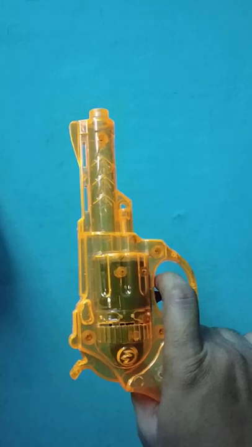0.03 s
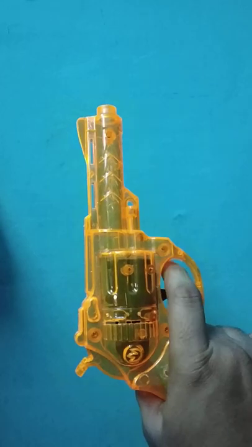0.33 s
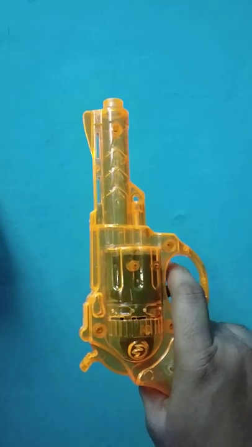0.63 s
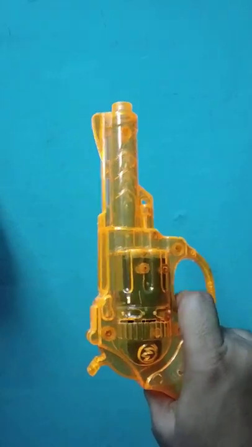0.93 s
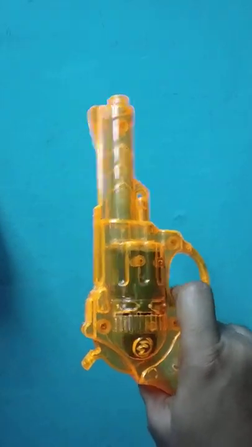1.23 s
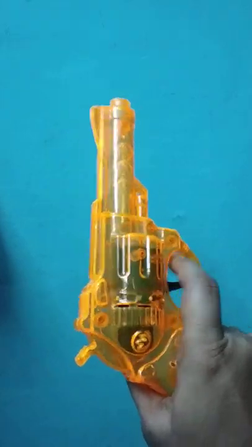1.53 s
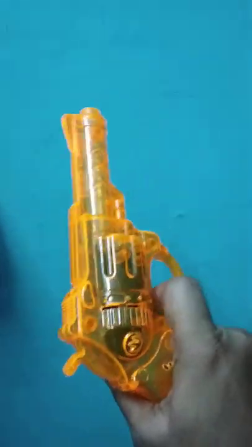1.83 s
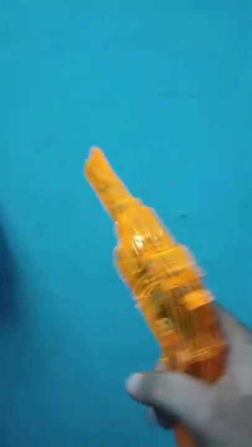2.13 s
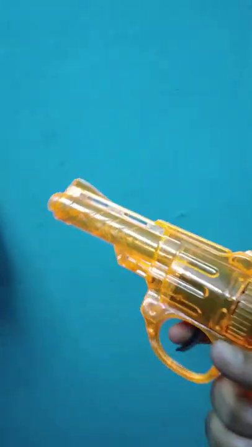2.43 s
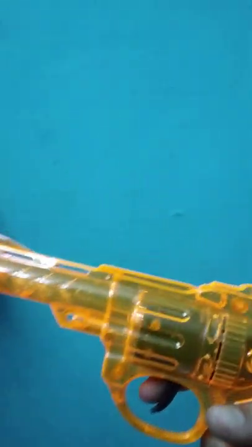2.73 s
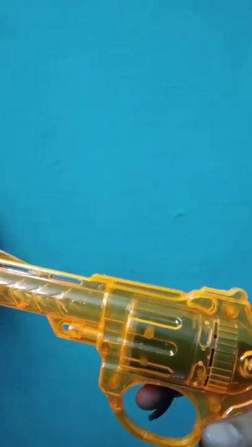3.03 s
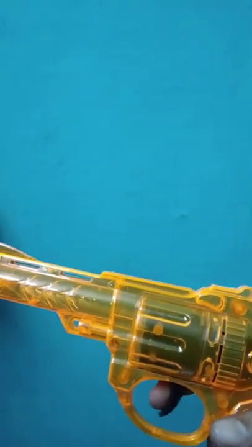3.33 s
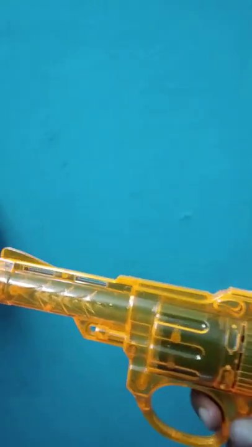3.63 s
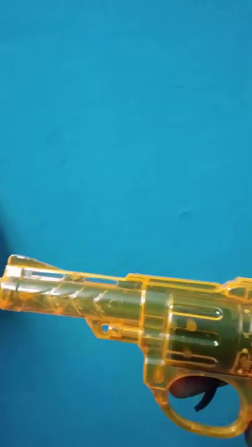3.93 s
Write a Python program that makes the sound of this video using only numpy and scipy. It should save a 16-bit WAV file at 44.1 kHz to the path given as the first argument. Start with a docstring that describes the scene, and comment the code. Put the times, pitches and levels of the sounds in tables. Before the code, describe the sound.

Harsh ratcheting clicks and whirring gears from a toy gun quicken, then wind down.

```python
"""A plastic toy spark gun, close to a stereo microphone in a small room with a faint hum.
Trigger pulls drive a flywheel through whirring gears; a springy striker snaps once a turn,
ever faster, then slower as the wheel coasts and rubs. The hollow shell adds a brief ring.
The recorder's limiter ducks at the snaps and lets room noise, rubbing and echo swell up in between."""
import sys
import numpy as np
from scipy import signal
from scipy.fft import rfft, irfft, next_fast_len
from scipy.io import wavfile
from scipy.ndimage import uniform_filter1d, minimum_filter1d, map_coordinates

SR = 44100
rng = np.random.default_rng(int(sys.argv[2]) if len(sys.argv) > 2 else 0)


def persist_wave(psi):
    """Save psi, clipped to +-1, as 16-bit WAV."""
    counts = np.round(np.clip(psi, -1, 1) * 32767).astype(np.int16)
    wavfile.write(sys.argv[1], SR, np.atleast_2d(counts).T)


N = 176400

# The striker's snaps, one a turn of the wheel. Each row: start in seconds, relative level in dB.
SNAPS = [(.7288, -1.5), (0.8491, -6), (.912, -3), (0.9778, 1), (1.0455, 2), (1.1111, 0), (1.1653, -0.5),
         (1.2133, -0.5), (1.2633, 3.5), (1.3142, 1), (1.3618, 0.5), (1.4043, -1), (1.446, 2.5), (1.4878, 4),
         (1.5311, 1.5), (1.574, -1), (1.6116, 0), (1.6485, 2.5), (1.6856, 9), (1.7244, 7.5), (1.7637, 5),
         (1.799, 6), (1.8342, 2), (1.8687, 2.5), (1.9022, 2.5), (1.9388, 2), (1.9746, 3.5), (2.0123, 2.5),
         (2.0491, 2), (2.0861, 2), (2.1271, 3.5), (2.1664, 6.5), (2.2088, 5.5), (2.2516, 4.5), (2.297, 3),
         (2.3423, 0.5), (2.3897, 1.5), (2.437, 3), (2.4872, 0), (2.5413, 4), (2.5955, 2.5), (2.6522, 0.5),
         (2.712, 2.5), (2.7744, 2), (2.8401, 2), (2.9089, 3), (2.983, -1), (3.0616, -0.5), (3.1467, 2),
         (3.2424, 4.5), (3.3495, 3.5), (3.4704, -1.5), (3.556, -1.5), (3.64, 3.5), (3.7316, 4.5),
         (3.8356, 3), (3.9556, 5)]


def amp(db):
    """Decibels to gain."""
    return 10 ** (np.asarray(db) / 20)


def along(points, hz):
    """Reads (Hz, value) points on a log frequency axis."""
    f, v = np.transpose(points)
    return np.interp(np.log(hz + 1), np.log(f + 1), v)


def level(rows):
    """A gain for every sample from (seconds, dB) points."""
    return amp(np.interp(np.arange(N) / SR, *np.transpose(rows)))


def filtered(x, response):
    """x through a filter whose gain is response(hz)."""
    size = next_fast_len(N + SR // 2)
    return irfft(rfft(x, size) * response(np.fft.rfftfreq(size, 1 / SR)), size)[..., :N]


def coloured(pair, spectrum):
    """Two unrelated signals become a stereo sound of rms 1 with this spectrum, wider in the treble."""
    # Likeness of the two channels. Each row: frequency in Hz, correlation.
    likeness = [(100, 0.65), (350, 0.93), (700, 0.64), (1400, 0.25), (4000, 0.22), (15000, 0.067)]
    angle = lambda hz: np.arccos(along(likeness, hz)) / 2
    response = lambda hz: amp(along(spectrum, hz)) * [np.cos(angle(hz)), np.sin(angle(hz))]
    mid, side = filtered(pair, response)
    return unit(np.array([mid + side, mid - side]))


def unit(x):
    """Scaled to rms 1."""
    return x / np.sqrt(np.mean(x ** 2) + 1e-20)


def add(track, start, sound):
    """Mixes a sound in at start seconds."""
    part = track[:, round(start * SR):][:, :sound.shape[-1]]
    part += sound[..., :part.shape[1]]


def wobble(rate):
    """A smooth random curve, rate knots a second."""
    return map_coordinates(rng.standard_normal(N), [np.arange(N) * rate / SR])


def room_noise():
    """The room's low rush fades in, with a slightly unsteady hum in it."""
    # Colour of the rush. Each row: frequency in Hz, relative level in dB.
    rush_colour = [(30, -44), (80, -28), (120, -19.5), (205, -8), (350, 4), (570, -9), (750, -8),
                   (1000, -11), (1400, -13), (1800, -16), (2600, -19), (5400, -25.5), (10000, -28.5),
                   (15500, -33)]
    # Tones of the hum. Each row: frequency in Hz, level in dB against the rush.
    hum_tones = [(208, -15), (248, -13), (308, -11.5), (372, -12)]
    # Fade of both. Each row: time in seconds, level in dB.
    fade = [(.075, -110), (.09, -56), (.15, -51), (.26, -44), (.45, -43), (.6, -43), (.66, -43.5),
            (.73, -38), (1, -39.5), (4, -37.5)]
    t = np.arange(N) / SR
    hum = sum(amp(db) * np.sin(2 * np.pi * hz * t + wobble(12)) for hz, db in hum_tones)
    rush = coloured(rng.standard_normal((2, N)), rush_colour)
    return level(fade) * (rush + np.sqrt(2) * hum)


def trigger(tick_t60_s=0.012, tail_t60_s=0.38):
    """The trigger takes up its slack: small plastic ticks as the teeth engage."""
    # The ticks. Each row: start in seconds, level in dB.
    ticks = [(.687, -22), (0.6909, -19.5), (0.6955, -13), (.708, -34)]
    envelope, t = np.zeros((2, N)), np.arange(SR // 10) / SR
    decay = amp(-60 * t / tick_t60_s) + amp(-22.5 - 60 * t / tail_t60_s)
    for start, db in ticks:
        add(envelope, start, amp(db) * decay)
    return envelope * rubbing()


def friction(spectrum, grit=0.17):
    """Friction noise that comes in tiny grains."""
    grains = rng.standard_normal((2, N)) * np.exp(grit * wobble(900))
    return coloured(unit(grains), spectrum)


def rubbing():
    """Plastic rubs on plastic, at the trigger and at the wheel."""
    # Colour of the rub. Each row: frequency in Hz, relative level in dB.
    rub_colour = [(100, -2), (350, -69.5), (720, -3.5), (950, -30), (1350, 13), (1800, 2), (2300, 7.5),
                  (3200, -3), (4200, -7), (6500, 2.5), (9000, 0), (15500, -12.5)]
    return friction(rub_colour)


def flywheel(cam_load_db=2):
    """The spinning wheel rubs, louder at speed and as its cam lifts the striker."""
    # Strength of the rub. Each row: time in seconds, level in dB.
    rub_levels = [(.68, -110), (.72, -57), (.76, -15.5), (.9, -18.5), (1.25, -13.5), (1.6, -8.5),
                  (2.0, -5.5), (2.3, -11.5), (2.7, -12), (3.1, -14.5), (3.6, -14), (4, -17.5)]
    turn = np.interp(np.arange(N) / SR, np.transpose(SNAPS)[0], np.arange(len(SNAPS))) % 1
    load_db = cam_load_db * (turn ** 2 - .5) + 1.7 * wobble(60)
    return level(rub_levels) * amp(load_db) * shell(rubbing())


def shell(x, ring_db=-6, t60_s=0.015):
    """The hollow plastic body adds its dense, short resonances; rms 1."""
    t = np.arange(SR // 40) / SR
    body = rng.standard_normal((2, len(t))) * amp(-60 * t / t60_s)
    body /= np.linalg.norm(body[0])
    return unit(x + amp(ring_db) * signal.fftconvolve(x, body, axes=1)[:, :N])


def striker():
    """Each snap, much like the last: a crack at the slip, a bright ring on landing, the room's answer."""
    # Colour of the crack. Each row: frequency in Hz, relative level in dB.
    crack_colour = [(100, -62), (400, -26), (750, -14.5), (1400, -10.5), (2700, -3.5), (3400, -2),
                    (4050, 3), (4550, 5.5), (5000, 8.5), (5500, 8), (6500, -4.5), (8200, 0.5), (9300, 8.5),
                    (10100, -2), (12000, -2), (13500, 3), (14500, -14), (15600, -1)]
    # Modes stirred at the slip and on landing. Each row: frequency in Hz, relative dB, t60 in seconds.
    slip_modes = [(1550, -59.5, 0.045), (3959, -1, 0.018), (4080, -4.5, 0.027), (4800, -21, 0.024)]
    landing_modes = [(5210, 19, 0.0099), (5130, 3.5, 0.035), (5100, -14, 0.25), (5180, -1.5, 0.092),
                     (5580, -21, 0.09), (8820, -13, .016), (9270, -4, 0.048), (11760, -2.5, 0.017)]
    # The ring sags a little while the wheel spins fast. Each row: time in seconds, pitch factor.
    ring_pitch = [(.73, 1), (1.4, 0.99), (2.0, 0.99), (2.7, 0.99), (3.3, 1.005), (4, 1.028)]
    # The room's answer changes as the toy is turned. Each row: time in seconds, change in dB.
    echo_change = [(.73, -0.5), (1.3, 0), (2.0, 1.5), (2.3, -1.5), (3.0, -2), (4, -2)]
    snap_gain_db, crack_gain_db, echo_gain_db = 4, 4, -4.5
    crack_rise_s, crack_t60_s, landing_delay_s, landing_rise_s = 0.00015, 0.037, .0016, .0006
    crack_alike, echo_alike = 0.3, 0.73  # shares of power common to all snaps
    out, t = np.zeros((2, N)), np.arange(SR // 5) / SR
    noise = shell(coloured(rng.standard_normal((2, N)), crack_colour))
    common_grain, common_tail = noise[:, SR:SR + len(t)], room_tail()
    crack_envelope = amp(crack_gain_db - 60 * t / crack_t60_s) * (1 - np.exp(-t / crack_rise_s))
    landed = np.maximum(t - landing_delay_s, 0)
    for start, db in SNAPS:
        fresh_grain = noise[:, rng.integers(N - len(t)):][:, :len(t)]
        grain = np.sqrt(crack_alike) * common_grain + np.sqrt(1 - crack_alike) * fresh_grain
        pitch = np.interp(start, *np.transpose(ring_pitch))
        slip = grain * crack_envelope + ring(slip_modes, t, pitch)
        landing = ring(landing_modes, landed, pitch) * (1 - np.exp(-landed / landing_rise_s))
        snap = amp(snap_gain_db + db) * (slip + landing)
        tail = np.sqrt(echo_alike) * common_tail + np.sqrt(1 - echo_alike) * room_tail()
        echo_db = echo_gain_db + np.interp(start, *np.transpose(echo_change))
        add(out, start, snap)
        add(out, start, amp(echo_db) * signal.fftconvolve(snap, tail, axes=1))
    return out


def ring(modes, t, pitch, scatter_db=1.5, scatter_pitch=0.014):
    """The striker's damped modes, a little different at every blow."""
    out = np.zeros(len(t))
    for hz, db, t60 in modes:
        louder, sharper = rng.standard_normal(2)
        detune = 1 + scatter_pitch * sharper * np.exp(-t60 / 0.088)  # long modes stray least
        out += amp(db + scatter_db * louder - 60 * t / t60) * np.sin(2 * np.pi * hz * pitch * detune * t)
    return out


def room_tail(build_s=0.033):
    """The small room's stereo echo; each frequency dies at its own speed."""
    # Decay of the room. Each row: frequency in Hz, t60 in seconds.
    decay_times = [(200, 0.55), (1500, 0.33), (5000, 0.14), (15000, 0.15)]
    hz, t, bands = signal.stft(rng.standard_normal((2, SR // 3)), SR, nperseg=256)
    envelope = amp(-60 * t / along(decay_times, hz)[:, None]) * (1 - np.exp(-t / build_s))
    tail = signal.istft(bands * envelope, SR, nperseg=256)[1]
    return tail / np.linalg.norm(tail[0])


def gears(mesh_rise_per_s=2.6, mesh_jitter=.024, mesh_db=-1.5, treble_hz=2800):
    """Each pull swells into a rasp with a rising, rough tooth tone; slow gears sound duller."""
    # Trigger pulls and slow binding of the gears. Each row: time of the hardest push, rise and fall
    # in seconds, level in dB, tooth rate at that push in Hz, treble gain in dB.
    pulls = [(.838, 0.056, 0.022, -10, 1335, 0), (1.107, 0.043, 0.059, -2, 1380, -2),
             (1.362, .03, 0.06, -1.5, 1934, -1.5), (1.578, .03, 0.022, -3.5, 2170, 3.5),
             (1.795, 0.018, 0.049, 2.5, 2400, 1), (2.07, .025, 0.022, -12, 2320, 0),
             (3.23, .025, 0.029, -11.5, 650, -15), (3.335, .02, .014, -9.5, 650, -12),
             (3.453, 0.023, 0.056, -7.5, 1130, -12), (3.548, 0.014, 0.036, -11.5, 624, -5),
             (3.825, .018, 0.0094, -15, 639, 0)]
    # Colour of the gears. Each row: frequency in Hz, relative level in dB.
    gear_colour = [(100, -37), (400, -19), (950, -19.5), (1200, -5.5), (1400, 2), (1800, -6), (2500, -2),
                   (3200, -4.5), (4500, 6), (6000, 2), (8000, 1.5), (10500, -7.5), (15500, -12)]
    out, t = np.zeros((2, N)), np.arange(N) / SR
    rasp = shell(friction(gear_colour))
    unsteady, chatter = 1 + mesh_jitter * wobble(700), amp(3 * wobble(250))
    for push, rise, fall, db, hz, treble_db in pulls:
        near = abs(t - push) < .15
        since = t[near] - push
        mesh_hz = hz * np.exp(mesh_rise_per_s * np.minimum(since, fall / 2)) * unsteady[near]
        phase = 2 * np.pi * np.cumsum(mesh_hz) / SR
        teeth = sum(amp(along(gear_colour, k * hz)) * np.sin(k * phase + rng.uniform(0, 2 * np.pi))
                    for k in range(1, 7))
        whir = rasp[:, near] + amp(mesh_db) * unit(chatter[near] * teeth)
        dull = signal.filtfilt(*signal.butter(2, treble_hz, fs=SR), whir)
        swell = np.exp(-(since / np.where(since < 0, rise, fall)) ** 2)
        out[:, near] += amp(db) * swell * (dull + amp(treble_db) * (whir - dull))
    return out


def scene(bass_cut_hz=356, left_lag_s=.00006):
    """The toy up close over the room's noise, all reaching the left microphone slightly later."""
    # The toy's stereo balance. Each row: frequency in Hz, left over right in dB.
    balance = [(300, 1.5), (700, -4), (1400, -2), (2500, 1.5), (5000, 3), (7000, -2), (9500, -1),
               (12000, 0.5)]
    thin = lambda hz: (1j * hz / (bass_cut_hz + 1j * hz)) ** 2  # the shell gives no bass
    pan = lambda hz: amp(np.outer([.5, -.5], along(balance, hz)))
    lag = lambda hz: np.exp(1j * np.pi * left_lag_s * np.outer([-1, 1], hz))
    toy = filtered(striker() + gears() + flywheel() + trigger(), lambda hz: thin(hz) * pan(hz))
    return filtered(toy + room_noise(), lag)


def record(dry):
    """The recorder's limiter clamps at once and recovers steadily; the highest treble is cut off."""
    ceiling_db, release_db_per_s, top_hz = -7.5, 172.5, 15900
    detect_s, lookahead_s = 0.0004, 0.001
    power = abs(uniform_filter1d((dry ** 2).mean(axis=0), int(detect_s * SR)))
    over_db = np.maximum(10 * np.log10(power + 1e-12) - ceiling_db, 0)
    recovery_db = release_db_per_s * np.arange(N) / SR
    cut_db = np.maximum.accumulate(over_db + recovery_db) - recovery_db
    width = int(lookahead_s * SR)
    gain = amp(uniform_filter1d(minimum_filter1d(-cut_db, width), width))
    return filtered(dry * gain, lambda hz: hz < top_hz)


dry = scene()
out = record(dry)
persist_wave(out)
```